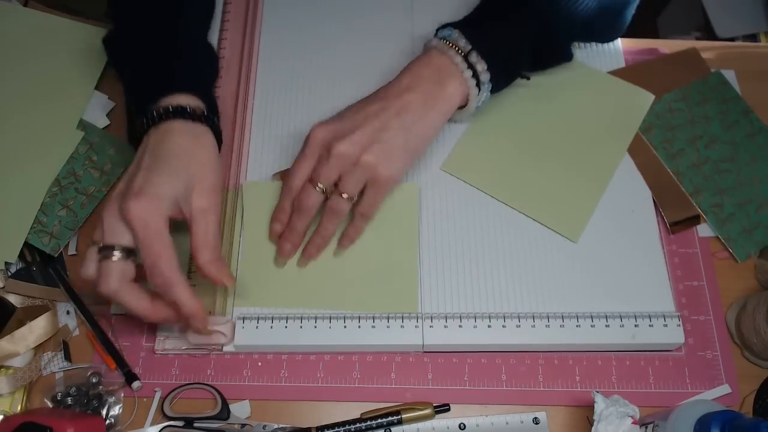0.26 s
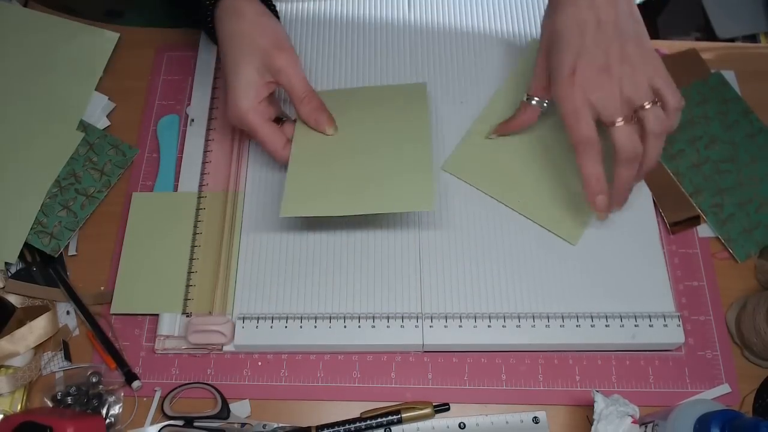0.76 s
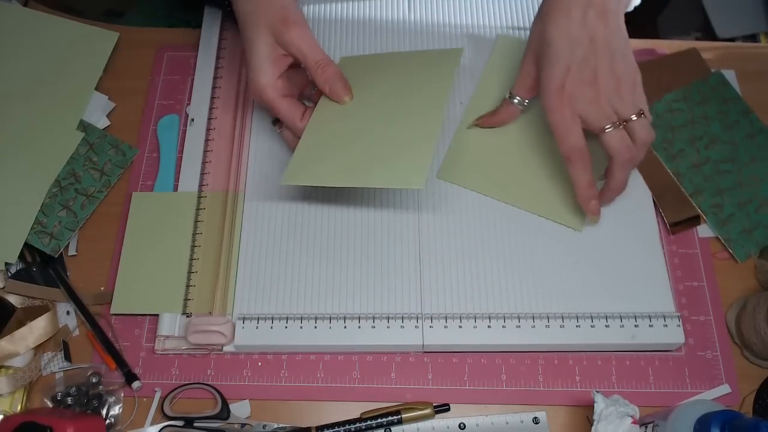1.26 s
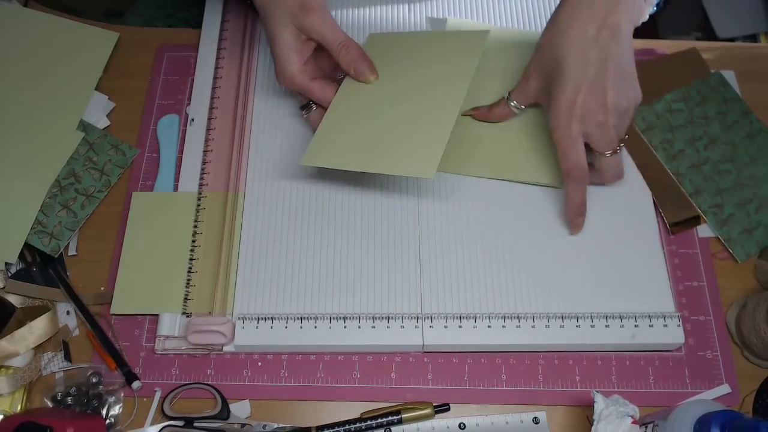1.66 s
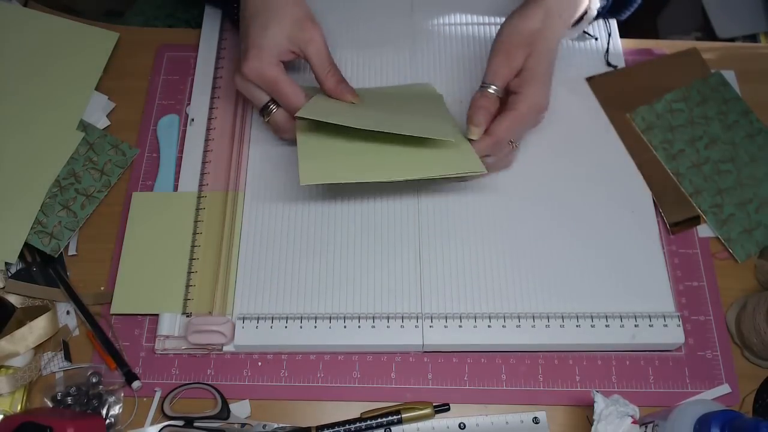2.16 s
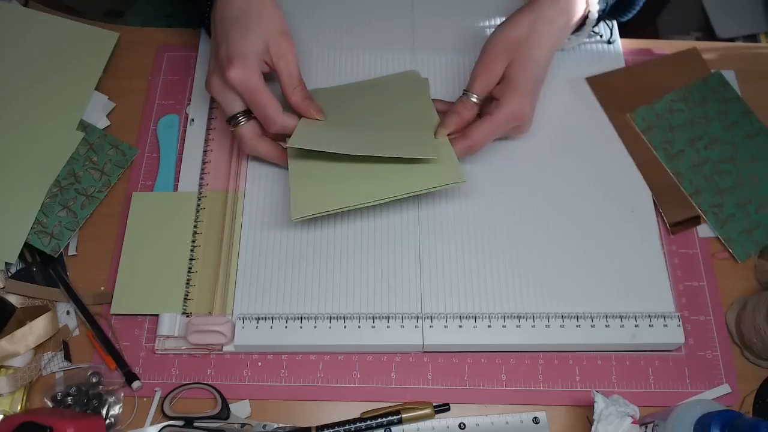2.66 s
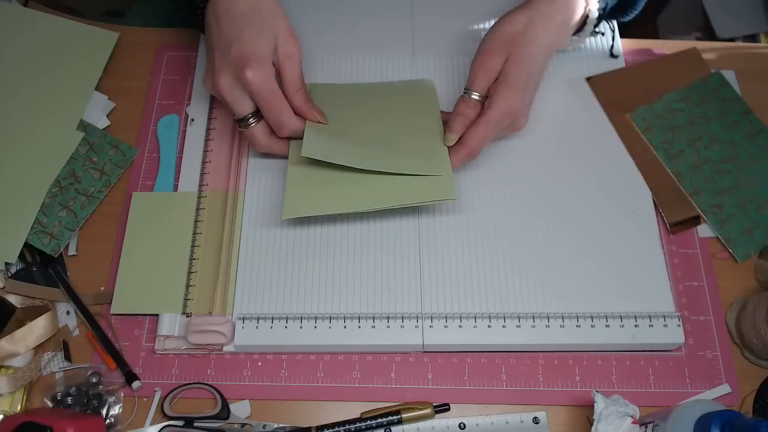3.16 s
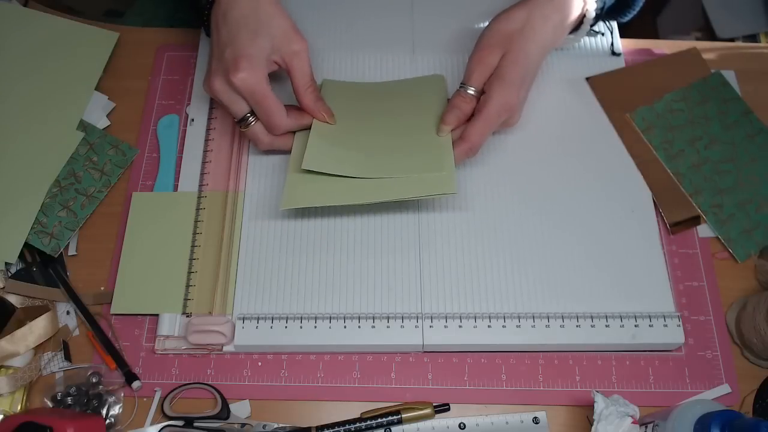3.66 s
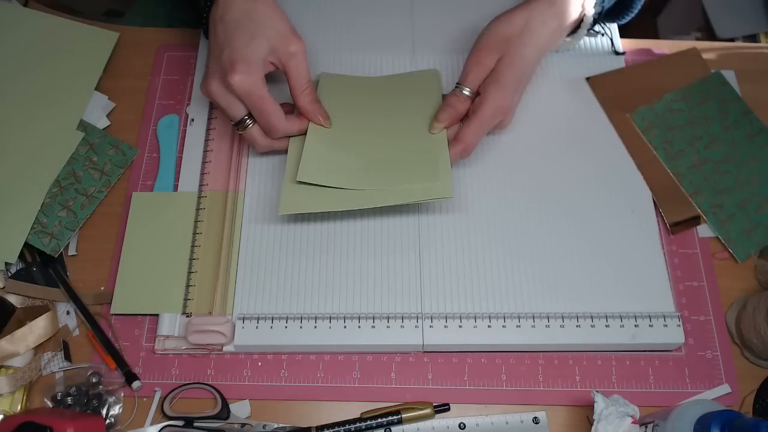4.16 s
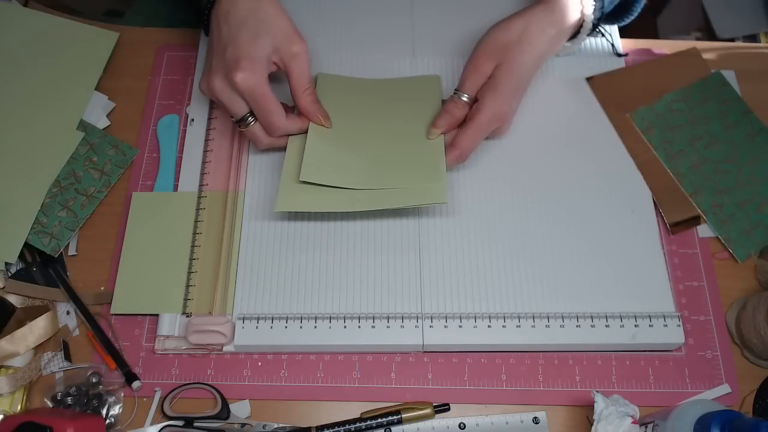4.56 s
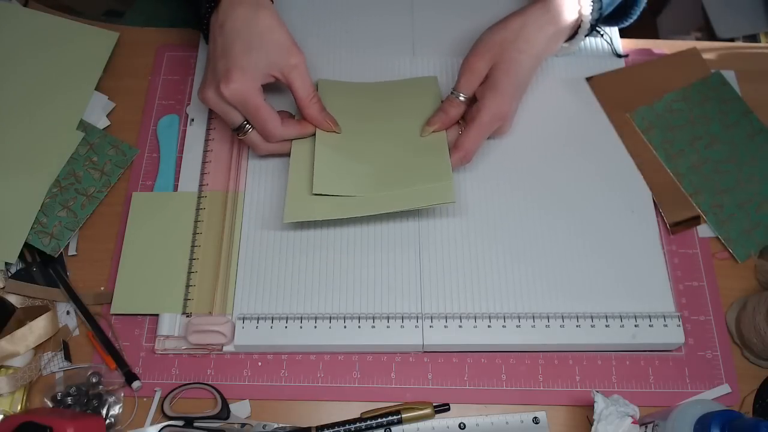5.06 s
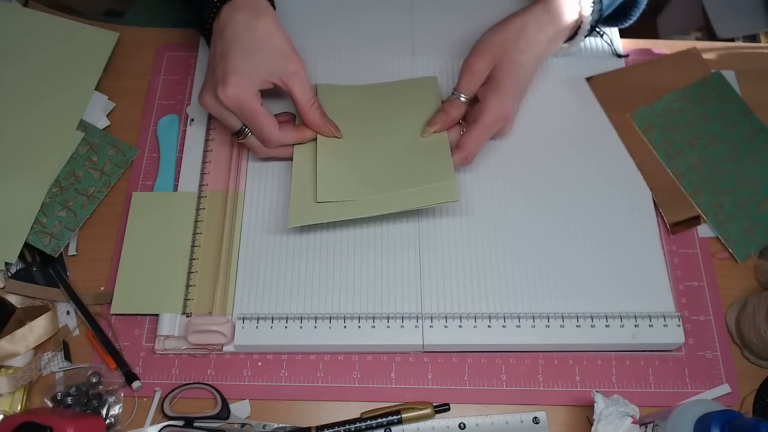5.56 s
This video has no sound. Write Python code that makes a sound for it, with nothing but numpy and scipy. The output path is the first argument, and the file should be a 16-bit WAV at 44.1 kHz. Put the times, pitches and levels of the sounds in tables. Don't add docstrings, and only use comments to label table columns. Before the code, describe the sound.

Close-up hands trim card with a sharp click and short scrape, then rustle and tap stiff sheets ever more quietly in a still room.

```python
import sys
import numpy as np
from scipy import signal
from scipy.io import wavfile

SR = 44100
rng = np.random.default_rng(int(sys.argv[2]) if len(sys.argv) > 2 else 0)


def inscribe(sig):
    pcm = np.round(np.clip(np.atleast_2d(sig).T, -1, 1) * 32767)
    wavfile.write(sys.argv[1], SR, pcm.astype(np.int16))


def convert_level_to_amplitude(level_db):
    exponent = np.asarray(level_db, float) / 20
    return 10 ** exponent


N = 256655

# freq_hz, level_db (per Hz)
AIR_SPECTRUM = [(12, -40.5), (20, -10.5), (48, -13.5), (80, -8), (105, 0), (183, -9.5), (248, -19.5),
                (645, -22), (941, -21.5), (1310, -21), (1860, -27), (3230, -49.5), (5210, -32.5),
                (7410, -50.5), (8200, -59), (10700, -104.5), (18000, -120)]
# pitch_hz, level_db (rms)
MAINS_HUM = [(100, -56), (942, -82.5)]
# freq_hz, level_db (per Hz)
CARD_HISS = [(1100, -6), (1700, -0.5), (2100, -0.5), (2600, -4.5), (3300, -2.5), (4200, -8.5), (5200, -2.5),
             (6500, -10.5), (7600, -3.5), (9000, -16)]
# centre_hz, width_hz, boost_db
HISS_PEAKS = [(2400, 100, 4.5), (4620, 960, 1)]
# pitch_hz, level_db, t60_s
BOARD_MODES = [(553, -12.5, 0.046), (653, -7, .05), (751, 5.5, 0.036), (839, 1.5, 0.042),
               (894, -8.5, 0.034), (1038, -17.5, 0.096)]
# pitch_hz, level_db, t60_s
TABLE_MODES = [(58, -14.5, 0.053), (86.2, -7.5, 0.12), (137.3, -2.5, .14), (178, -2, 0.11),
               (230.6, -1, 0.12), (318, 3, 0.067), (370, 3.5, 0.038), (478.3, -5, 0.19)]

# start_s, length_s, dull_peak_db, bright_over_dull_db
FLICKS = [(0.0, 0.055, -48.5, 1), (.112, 0.03, -29.5, -0.5), (.228, 0.095, -45.5, 5),
          (.756, 0.35, -55.5, 4), (.968, 0.073, -55, 13), (1.075, 0.026, -44.5, 6.5),
          (1.132, 0.031, -37.5, 1), (1.545, 0.057, -39.5, -3), (1.635, 0.18, -38.5, 2),
          (2.335, 0.05, -52, -3), (2.497, 0.13, -60, 0.5), (2.639, 0.26, -57, -1), (3.251, 0.44, -61, 5),
          (4.22, 0.23, -67, -2.5), (4.3, 0.035, -54.5, 1.5), (4.41, 0.11, -64.5, 1.5),
          (4.545, 0.19, -56.5, -2)]
PUSHES = [(.133, .095, -39, -1.5), (.39, 0.13, -59, 1.5), (.505, 0.029, -49.5, 3.5),
          (.715, 0.036, -42, -7.5), (.868, 0.092, -58, 0.5), (1.608, 0.035, -34, 2.5),
          (1.787, .067, -55.5, -12), (1.87, .085, -55.5, -0.5), (1.962, 0.029, -49, 10),
          (2.04, 0.074, -59, 0.5), (2.223, .112, -51.5, 0), (2.39, 0.039, -57, 1), (2.416, 0.013, -38, 0),
          (2.57, .07, -57.5, -3), (3.205, 0.042, -51.5, 2), (3.637, 0.156, -67.5, 5.5),
          (3.84, 0.067, -77.5, 6.5), (4.36, 0.056, -57.5, 4), (4.77, 0.064, -68, 2.5),
          (5.275, 0.017, -61, -26), (5.56, .082, -74, 2.5), (5.66, 0.14, -70, -12)]
SLIDES = [(.303, 0.073, -57, 3.5), (.534, 0.02, -46, 9), (.58, 0.12, -69.5, 10.5),
          (.667, 0.039, -59.5, 3.5), (1.17, 0.15, -55, -2.5), (1.329, .067, -52.5, 5.5),
          (1.396, 0.34, -54.5, 3), (1.988, 0.011, -42, 6), (2.122, .1, -54, 4.5),
          (2.432, 0.059, -41.5, 2.5), (2.848, 0.092, -63.5, -1), (2.928, .13, -55.5, 3.5),
          (3.058, .12, -55.5, 5.5), (3.925, 0.2, -65.5, 2), (4.094, .126, -59.5, 4),
          (4.505, 0.05, -64.5, -7), (4.809, 0.262, -66.5, -3.5), (5.11, .06, -68.5, -2)]
# time_s, level_db
HAND_WEIGHT = [(0, -67), (.15, -44.5), (.3, -57), (.5, -50.5), (.66, -64), (.8, -51.5), (1.04, -63.5),
               (1.25, -52.5), (1.5, -49), (1.9, -54.5), (2.1, -57.5), (2.4, -63), (2.9, -62.5),
               (3.6, -69.5), (4.2, -70.5), (4.55, -64), (5.55, -69.5), (5.72, -60)]
# time_s, spacing_hz
CARD_HEIGHT = [(0, 2660), (.55, 2770), (.9, 2580), (1.05, 2070), (1.2, 2660), (1.6, 2470), (2.0, 2400),
               (2.3, 2680), (2.45, 2870), (2.6, 2610), (3.6, 2590), (4.0, 2200), (4.2, 2440), (4.75, 2480),
               (4.9, 1960), (5.82, 2200)]

# start_s, peak_db, favoured_pitch_hz
THUDS = [(0.001, -23, 101), (0.05, -27, 61.9), (0.122, -48, 248), (0.438, -39, 123), (0.534, -39, 112),
         (0.545, -38, 374), (0.585, -32.5, 338), (0.709, -33, 104), (0.724, -20.5, 106),
         (0.739, -24.5, 137), (0.757, -24.5, 92), (0.83, -33, 137), (1.077, -23, 114), (1.093, -32, 207),
         (1.11, -25, 96.9), (1.143, -25.5, 440), (1.158, -19.5, 200), (1.202, -29.5, 107),
         (1.546, -33, 347), (1.562, -26, 493), (1.826, -33, 318), (2.036, -24, 152), (2.2, -36.5, 86.1),
         (2.872, -46, 95), (4.446, -39, 241), (4.567, -41.5, 150), (4.591, -40.5, 150), (4.653, -32.5, 120)]
# start_s, crack_peak_db, crack_centre_hz, board_knock_db
KNOCKS = [(0.0014, -34, 2300, -34), (0.0452, -29, 3040, -32), (0.1134, -16, 3910, -28),
          (0.1245, -27, 2330, -26), (0.4398, -36, 2100, -36.5), (0.5325, -26, 4640, -27),
          (0.5457, -21.5, 3160, -20), (0.585, -22, 1800, -27.5), (0.7085, -29.5, 5100, -37),
          (0.7239, -23.5, 1810, -24.5), (0.7385, -31, 1850, -37), (0.7587, -51, 1780, -35),
          (0.8076, -33.5, 2230, -44.5), (0.83, -45, 1750, -40.5), (0.9689, -29, 5600, -45),
          (1.076, -22, 1790, -20.5), (1.0933, -31.5, 3800, -49), (1.138, -29.5, 3020, -32),
          (1.1421, -27, 1830, -15.5), (1.1583, -27, 4030, -18.5), (1.2009, -33, 2400, -31),
          (1.3744, -46, 4940, -32.5), (1.5484, -26.5, 1770, -23), (1.8247, -38, 1900, -38.5),
          (1.872, -40.5, 5750, -38), (2.0391, -50, 2080, -32.5), (2.8746, -46.5, 2350, -48.5),
          (4.447, -39, 1670, -35.5), (4.592, -46, 1920, -50.5), (4.6514, -47, 1650, -42)]
# start_s, crack_peak_db, crack_centre_hz
TICKS = [(0.085, -41, 2350), (0.2478, -30.5, 1600), (0.63, -31.5, 2060), (0.8498, -30.5, 4030),
         (1.0037, -34.5, 4860), (1.1152, -40, 4930), (1.4898, -31.5, 2260), (1.5642, -32, 1910),
         (1.5825, -35, 3320), (2.0557, -39.5, 1980), (2.2005, -27, 1910), (2.392, -41.5, 1900),
         (2.6605, -40, 2300), (3.2186, -56, 5040), (5.416, -55, 1940), (3.384, -44, 2080),
         (3.9976, -48.5, 4070), (4.2158, -45.5, 1850), (4.4162, -45, 2690), (4.496, -46, 1500),
         (4.5174, -59, 1630), (4.544, -27.5, 2850), (4.6065, -46, 1970), (5.029, -47, 1815),
         (5.2885, -49, 1940), (5.3859, -47, 1910), (5.6192, -46.5, 1950), (5.717, -46, 1810),
         (5.7735, -47, 2010), (5.81, -47.5, 1940)]


def rms_one(x):
    return x / np.sqrt(np.mean(x ** 2) + 1e-20)


def in_time(curve):
    time_s, value = np.transpose(curve)
    return np.interp(np.arange(N) / SR, time_s, value)


def band(x, low_hz, high_hz, order=2):
    return signal.sosfilt(signal.butter(order, [low_hz, high_hz], "band", fs=SR, output="sos"), x)


def drift(rate_hz):
    r = np.exp(-80 * np.pi * rate_hz / SR)
    noise = rng.standard_normal(N // 40 + 2002)
    slow = signal.lfilter([1], [1, -2 * r, r * r], noise)[2000:]
    return np.interp(np.arange(N) / 40, np.arange(len(slow)), rms_one(slow))


def ring(x, hz, t60_s):
    r = convert_level_to_amplitude(-60 / (t60_s * SR))
    w = 2 * np.pi * hz / SR
    return signal.lfilter([0, np.sin(w)], [1, -2 * r * np.cos(w), r * r], x + 1e-18)


def struck(modes, push, colour_db, ring_share=1):
    out = sum(convert_level_to_amplitude(db + colour) * ring(push, hz, ring_share * t60_s)
              for (hz, db, t60_s), colour in zip(modes, colour_db))
    return out / np.abs(out).max()


def coloured(white, spectrum, patchy_db, patch_rate_hz):
    hz, db = np.transpose(spectrum)
    edges = hz[0] * 2 ** np.arange(0, np.log2(hz[-1] / hz[0]) + .1, 1 / 3)
    centres = np.sqrt(edges[1:] * edges[:-1])
    gains_db = np.interp(np.log(centres), np.log(hz), db)
    rows = []
    for k, (gain_db, low_hz, high_hz) in enumerate(zip(gains_db, edges, edges[1:])):
        flicker = convert_level_to_amplitude(gain_db + patchy_db * drift(patch_rate_hz))
        rows.append(flicker * band(white[k % 2], low_hz, high_hz))
    return centres, np.array(rows)


def sway_level():
    rest_db, kick_db, peak_after_s = -64.5, -30, 0.05
    start_s, peak_db, _ = np.transpose(THUDS)
    kicks = np.zeros(N)
    np.add.at(kicks, (start_s * SR).astype(int), convert_level_to_amplitude(peak_db + kick_db) ** 2)
    r = np.exp(-1 / (peak_after_s * SR))
    swing = signal.lfilter([np.e * (1 - r)], [1, -2 * r, r * r], kicks)
    return np.sqrt(convert_level_to_amplitude(rest_db + 3.7 * drift(3.2)) ** 2 + swing)


def background():
    air_db = -63
    t = np.arange(N) / SR
    _, air_bands = coloured(rng.standard_normal((2, N)), AIR_SPECTRUM, patchy_db=3.0, patch_rate_hz=10)
    air = rms_one(air_bands.sum(0))
    hum = sum(convert_level_to_amplitude(db + 3.5 + 0.63 * drift(18)) * np.sin(2 * np.pi * hz * t + 0.23 * drift(5.6))
              for hz, db in MAINS_HUM)
    sway = sway_level() * rms_one(band(rng.standard_normal(N), 33, 90.3, order=3))
    return convert_level_to_amplitude(air_db) * air + hum + sway


def fibres(per_s, spread_db):
    uneven_db = spread_db * np.minimum(rng.exponential(1, (2, N)), 5)
    sizes = convert_level_to_amplitude(uneven_db) * rng.standard_normal((2, N))
    return sizes * (rng.random((2, N)) < per_s / SR)


def strokes():
    attack_s, stop_db_per_s = .008, 1500.5
    bright_swing = 1.02
    t = np.arange(N) / SR
    hold_db = 0.42 * (in_time(HAND_WEIGHT) + 68)
    dull = convert_level_to_amplitude(-82.5 + hold_db) ** 2
    bright = convert_level_to_amplitude(-83 + hold_db) ** 2
    for rows, change_db, stops in [(FLICKS, -20.5, 0), (PUSHES, 7, 1), (SLIDES, -5, 1)]:
        for start_s, length_s, dull_db, bright_db in rows:
            ramp_db = change_db * (t - start_s) / length_s - max(change_db, 0)
            ramp_db = np.clip(ramp_db, -90, 0)
            onset = np.clip((t - start_s) / attack_s, 0, 1)
            overrun_s = np.maximum(t - start_s - length_s, 0)
            gate = onset * convert_level_to_amplitude(-stops * stop_db_per_s * overrun_s)
            dull = dull + (gate * convert_level_to_amplitude(dull_db + ramp_db)) ** 2
            bright = bright + (gate * convert_level_to_amplitude(dull_db + bright_db + bright_swing * ramp_db)) ** 2
    return 10 * np.log10(dull), 10 * np.log10(bright)


def aftermath(start_s, level_db, t60_s):
    kicks = np.zeros(N)
    np.add.at(kicks, (start_s * SR).astype(int), convert_level_to_amplitude(level_db) ** 2)
    return signal.lfilter([1], [1, -convert_level_to_amplitude(-120 / (t60_s * SR))], kicks + 1e-18)


def shaking(stroke_db):
    weight_db = in_time(HAND_WEIGHT)
    knock_s, _, _, knock_db = np.transpose(KNOCKS)
    thud_s, thud_db, _ = np.transpose(THUDS)
    board = convert_level_to_amplitude(weight_db + 2.5 + 0.41 * (stroke_db + 56)) ** 2
    board = board + aftermath(knock_s, knock_db - 11.5, t60_s=.15)
    table = convert_level_to_amplitude(weight_db) ** 2 + aftermath(thud_s, thud_db - 9, t60_s=0.18)
    return 10 * np.log10(board), 10 * np.log10(table)


def board_echo(x, stroke_db):
    blade_done_s = .28
    lag = SR / in_time(CARD_HEIGHT)
    share = np.clip(.34 + .04 * (stroke_db + 56), .1, .75)
    share[:round(blade_done_s * SR)] = 0.13
    at = np.arange(N)
    once = np.interp(at - lag, at, x)
    twice = np.interp(at - 2 * lag, at, x)
    return (x + share * once + 0.5 * share ** 2 * twice) / np.sqrt(1 + share ** 2)


def rubbing():
    split_hz = 3600
    dull_db, bright_db = strokes()
    board_db, table_db = shaking(dull_db)
    grip = convert_level_to_amplitude(1.83 * drift(28))
    slips = fibres(per_s=9700, spread_db=2.0) * grip
    hz, bands = coloured(slips, CARD_HISS, patchy_db=1.8, patch_rate_hz=20)
    dull = convert_level_to_amplitude(dull_db) * rms_one(bands[hz < split_hz].sum(0))
    bright = convert_level_to_amplitude(bright_db) * rms_one(bands[hz > split_hz].sum(0))
    hiss = dull + bright
    for centre_hz, width_hz, db in HISS_PEAKS:
        resonance = band(hiss, centre_hz - width_hz / 2, centre_hz + width_hz / 2, order=1)
        hiss = hiss + (convert_level_to_amplitude(db) - 1) * resonance
    board = sum(convert_level_to_amplitude(db) * ring(slips[k % 2], f, 0.23 * t60_s)
                for k, (f, db, t60_s) in enumerate(BOARD_MODES))
    table = sum(convert_level_to_amplitude(db) * ring(slips[k % 2], f, 0.31 * t60_s)
                for k, (f, db, t60_s) in enumerate(TABLE_MODES[2:]))
    shaken = convert_level_to_amplitude(board_db - 5.5) * rms_one(board) + convert_level_to_amplitude(table_db - 5.5) * rms_one(table)
    return convert_level_to_amplitude(-1.0) * board_echo(hiss, dull_db) + shaken


def thuds():
    out = np.zeros(N + SR)
    t = np.arange(SR // 4) / SR
    modes_hz = np.array(TABLE_MODES)[:, 0]
    for start_s, peak_db, hz in THUDS:
        chatter = rng.standard_normal(len(t))
        push = chatter * convert_level_to_amplitude(-60 * t / .04) * .03 - (t == 0)
        push = signal.lfilter([1], [1, -np.exp(-2 * np.pi * 3.0 * hz / SR)], push)
        octaves_off = np.abs(np.log2(modes_hz / hz))
        thud = struck(TABLE_MODES, push, -9 * octaves_off, ring_share=0.89)
        i = round(start_s * SR)
        out[i:i + len(t)] += convert_level_to_amplitude(peak_db) * thud
    return band(out[:N], 45, 2000, order=3)


def taps():
    knock_t60_s, tick_t60_s, tick_to_board_db = 0.022, 0.029, -26.5
    out = np.zeros(N + SR)
    t = np.arange(SR // 4) / SR
    rows = [(s, db, hz, knock_t60_s, knock_db) for s, db, hz, knock_db in KNOCKS]
    rows += [(s, db, hz, tick_t60_s, db + tick_to_board_db) for s, db, hz in TICKS]
    for start_s, crack_db, hz, t60_s, knock_db in rows:
        noise, chatter, chance = rng.standard_normal((3, len(t)))
        burst = noise * (convert_level_to_amplitude(-60 * t / t60_s) + 2.75 * convert_level_to_amplitude(-60 * t / 0.0012))
        edge = ring(noise * convert_level_to_amplitude(-60 * t / 0.029), hz, 22 / hz)
        crack = rms_one(band(burst, 2300, 4500, order=1)) + 1.1 * rms_one(edge)
        crack = crack / np.abs(crack).max()
        push = chatter * convert_level_to_amplitude(-60 * t / .03) * .09 + (t == 0)
        knock = struck(BOARD_MODES, push, 2.5 * chance)
        i = round((start_s + .0008) * SR)
        out[i:i + len(t)] += convert_level_to_amplitude(crack_db) * crack + convert_level_to_amplitude(knock_db) * knock
    return out[:N]


def room(x):
    t60_s, gap_s = 0.17, .004
    t = np.arange(SR // 2) / SR
    tail = rng.standard_normal(len(t)) * convert_level_to_amplitude(-60 * t / t60_s) * (t > gap_s)
    tail = band(tail, 150, 6300, order=1)
    return signal.fftconvolve(x, tail / np.sqrt(np.sum(tail ** 2)))[:N]


def scene():
    room_db = -19.5
    work = rubbing() + thuds() + taps()
    return (work + convert_level_to_amplitude(room_db) * room(work) + background())[None]


def low_pass(x):
    return signal.sosfilt(signal.butter(12, 8440, fs=SR, output="sos"), x)


def record(dry):
    notch_hz, width_hz, depth = 1313, 186, 0.72
    top_hz = 7114
    dip = band(dry, notch_hz - width_hz / 2, notch_hz + width_hz / 2, order=1)
    steep = signal.butter(20, top_hz, fs=SR, output="sos")
    mix = signal.sosfilt(steep, dry - depth * dip)
    return low_pass(mix)


dry = scene()
out = record(dry)
inscribe(out)
```